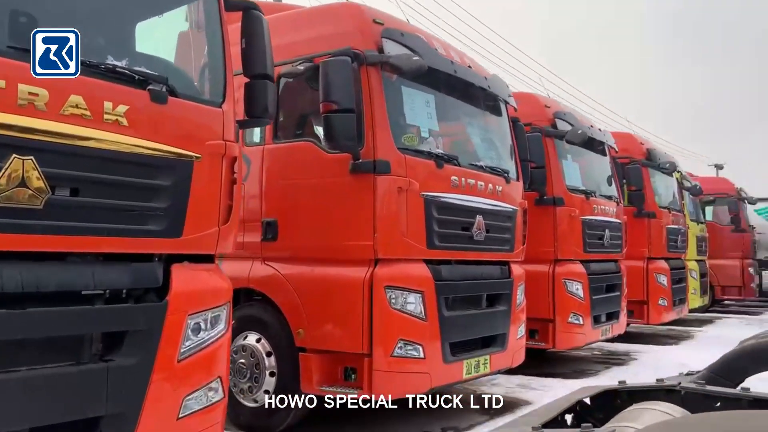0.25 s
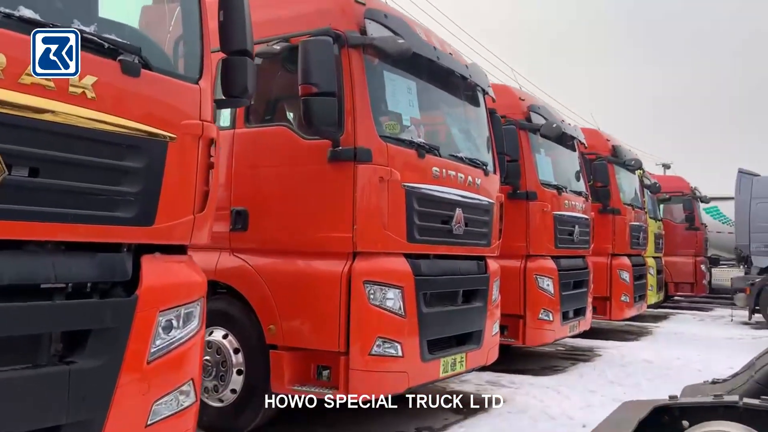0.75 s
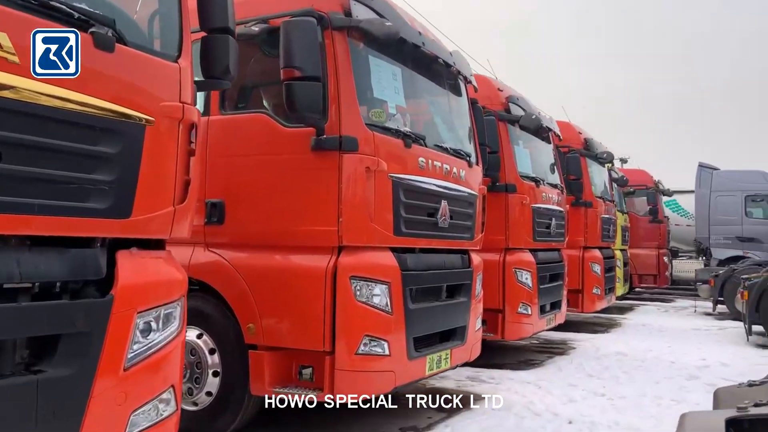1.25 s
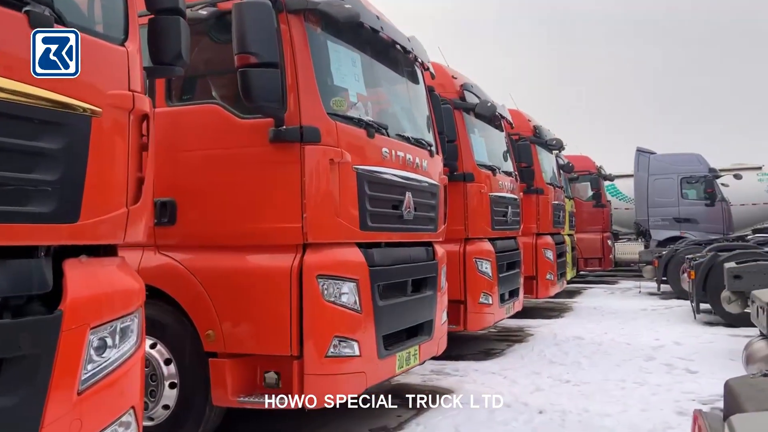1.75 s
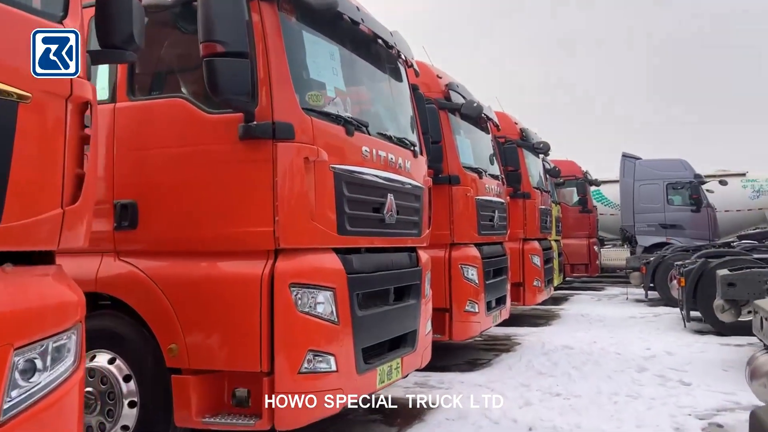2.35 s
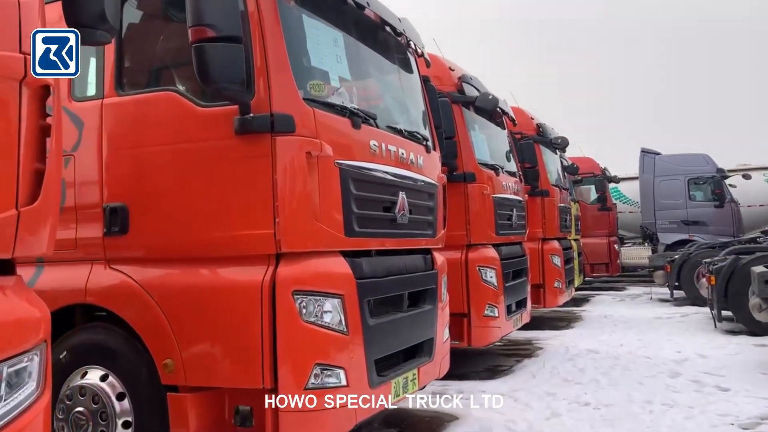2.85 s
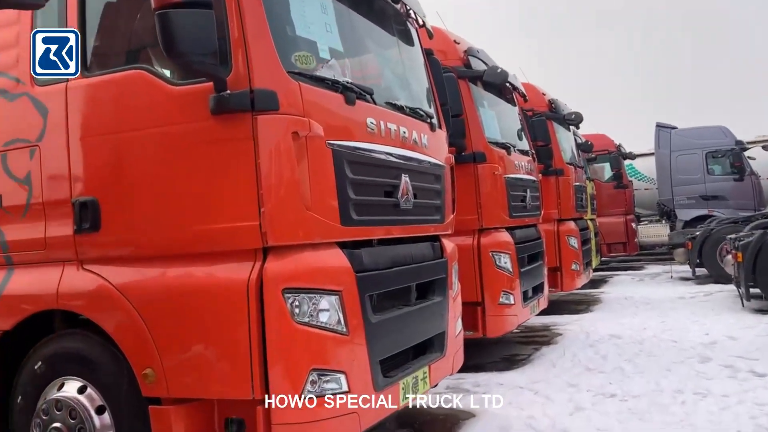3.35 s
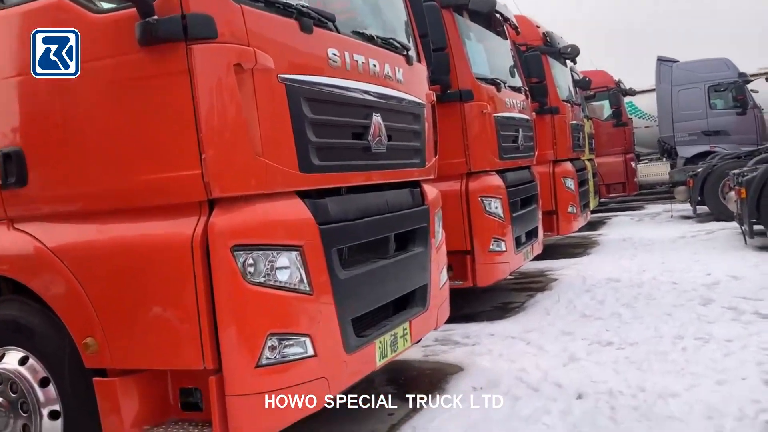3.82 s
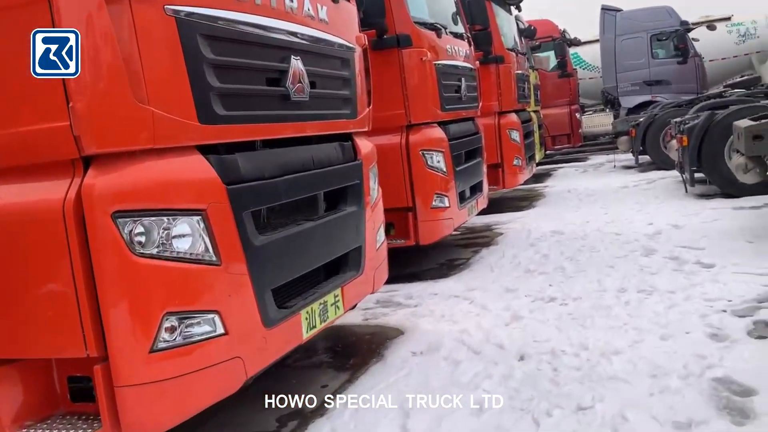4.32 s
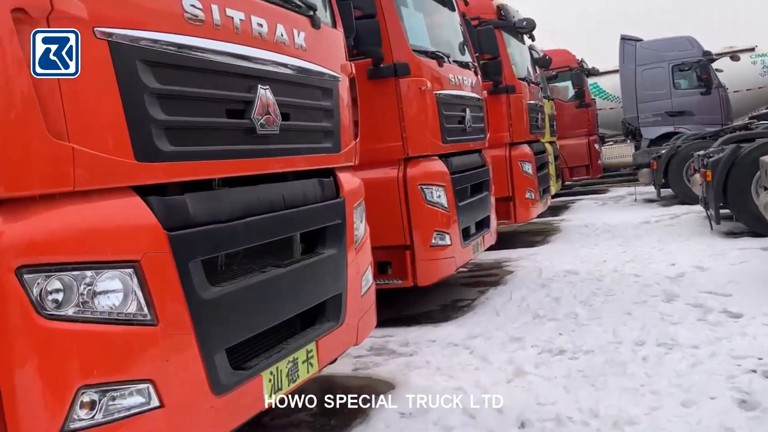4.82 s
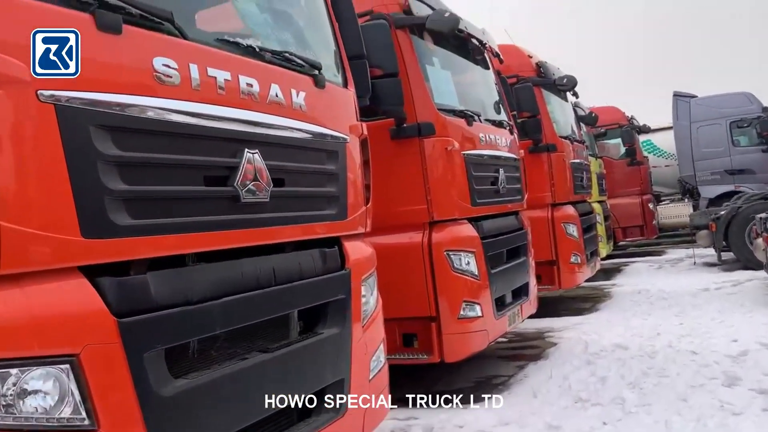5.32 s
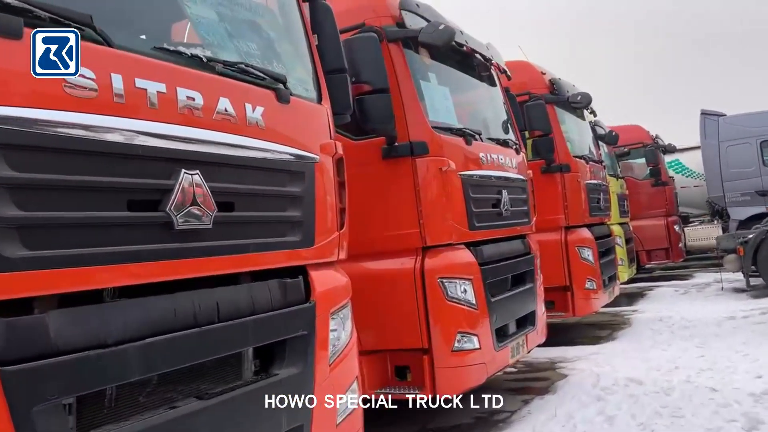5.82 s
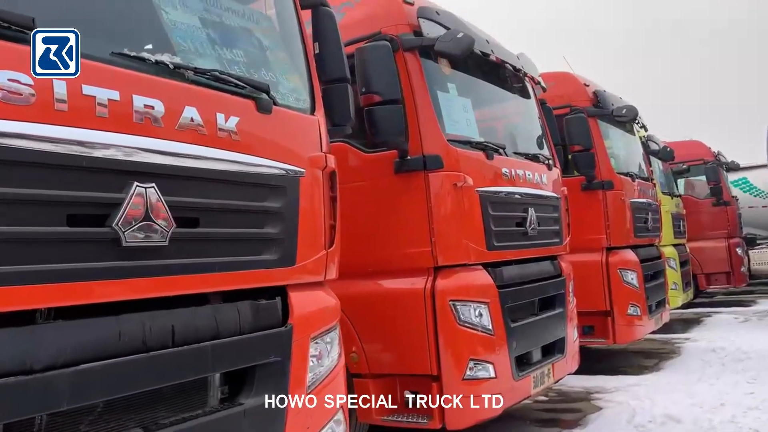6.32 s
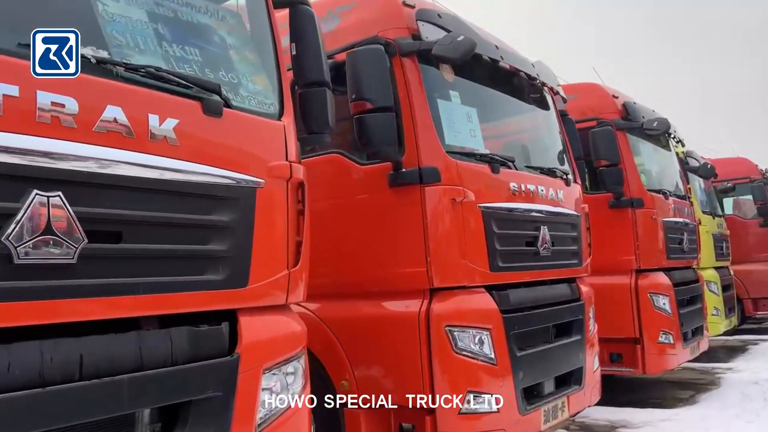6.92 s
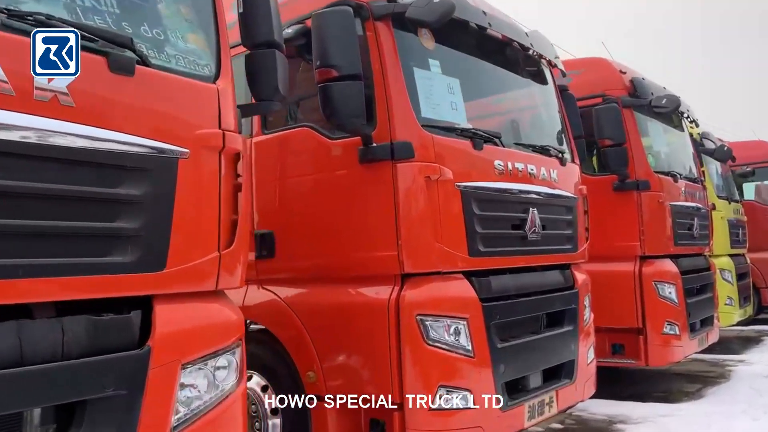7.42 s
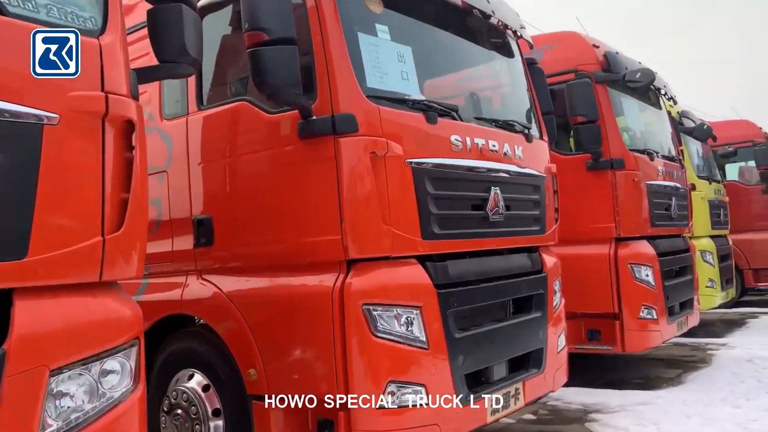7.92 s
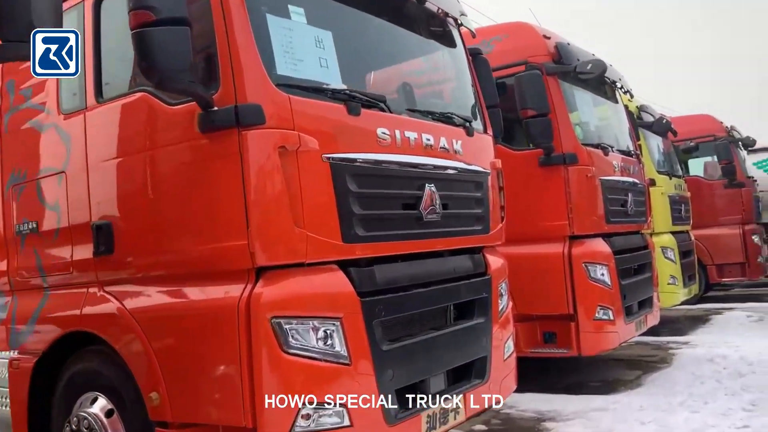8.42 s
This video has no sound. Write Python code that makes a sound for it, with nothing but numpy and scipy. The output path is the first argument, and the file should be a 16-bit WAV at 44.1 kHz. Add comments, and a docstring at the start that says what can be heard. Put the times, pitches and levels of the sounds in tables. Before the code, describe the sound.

Outdoors in a snowy truck yard, a diesel engine rumbles and clatters over distant traffic, rising in pitch for about three seconds before dropping back. A steady low drone remains while someone walks close to the microphones, each step a soft muffled thud with wet squelch, crumbling slush, gritty scuffs and tiny ice snaps. Wide stereo; the background gradually sinks.

```python
"""A diesel engine rumbles and clatters over the wash of distant traffic, speeds up and drops back.
Then it drones on while someone walks through packed snow and slush in a truck yard.
The engine is a stack of firing harmonics; rumble, traffic and hiss are coloured patchy noise.
Steps are filtered jolts with a wet squelch, ringing grit in the scuffs, snapping ice and popping air,
over the crush and fizz of snow under the sole."""
import sys
import numpy as np
from scipy import signal
from scipy.fft import rfft, irfft, next_fast_len
from scipy.io import wavfile
from scipy.ndimage import uniform_filter1d, map_coordinates

SR = 44100
rng = np.random.default_rng(int(sys.argv[2]) if len(sys.argv) > 2 else 0)


def master_out(mix):
    """Clip the mix to full scale and print it as 16-bit PCM to the path in sys.argv[1]."""
    frames = np.transpose(np.atleast_2d(mix))
    ceiling = np.clip(frames, -1, 1)
    pcm = np.round(ceiling * 32767).astype(np.int16)
    wavfile.write(sys.argv[1], SR, pcm)


N = 381906  # length in samples

# The sole slides through grit:
# centre_s, relative level_db, half_length_s, middle grain_pitch_hz, relative wet_fizz_db
SCUFFS = [(0.669, -40.5, 0.012, 2200, -53.5), (0.694, -47, 0.014, 1790, -64),
          (1.133, -39.5, 0.0064, 1480, -55), (1.368, -35.5, 0.013, 1177, -49.5),
          (1.705, -44.5, 0.017, 1220, -91), (2.022, -50, 0.011, 1900, -60), (2.18, -41.5, 0.023, 1700, -47),
          (2.842, -42.5, 0.026, 1380, -59.5), (3.255, -40.5, 0.017, 1017, -69),
          (3.921, -45.5, 0.013, 955, -74), (4, -47, 0.016, 1260, -69), (4.98, -56.5, 0.025, 2480, -54.5),
          (5.079, -50, 0.012, 3985, -62), (5.95, -52.5, 0.023, 1600, -66), (7.139, -48.5, 0.014, 1180, -56),
          (7.178, -36.5, 0.006, 1290, -49), (7.213, -34, 0.01, 1060, -49), (7.232, -42.5, 0.017, 1500, -48),
          (7.298, -47.5, 0.028, 710, -89)]
# Weight rolls over one foot and squeezes the snow:
# centre_s, half_length_s, relative hiss_db, relative wet_fizz_db
STRIDES = [(0.083, 0.24, -64, -69.5), (0.75, 0.11, -58.5, -70), (1.4, 0.13, -58.5, -62),
           (2.094, 0.35, -62.5, -67), (2.857, 0.31, -67.5, -70), (3.524, 0.17, -66, -70),
           (4.084, 0.23, -61, -66), (4.757, 0.19, -65, -70.5), (5.3, 0.078, -62.5, -70.5),
           (5.86, 0.18, -59, -68), (6.566, 0.14, -62, -65.5), (7.414, 0.27, -67.5, -79),
           (7.873, 0.14, -64, -87), (8.377, 0.17, -67, -75)]
# Colour of the hiss in the yard and under the sole: pitch_hz, relative level_db
HISS = [(1500, 7.5), (3000, 7.5), (4400, 12), (5200, 1), (7000, 3.5), (9000, -24), (16000, -36)]


def amp(db):
    """Decibels to gain."""
    return 10 ** (np.asarray(db) / 20)


def unit(x):
    """Scale to rms 1."""
    return x / np.sqrt(np.mean(x ** 2) + 1e-20)


def along(points, hz):
    """(Hz, value) points read on a log frequency axis."""
    f, v = np.transpose(points)
    return np.interp(np.log(hz + 1), np.log(f + 1), v)


def curves(rows):
    """One value per sample for each column after the time."""
    s, *cols = np.transpose(rows)
    return [np.interp(np.arange(N) / SR, s, c) for c in cols]


def wobble(rate):
    """A smooth random curve with `rate` knots a second."""
    knots = rng.standard_normal(int(N * rate / SR) + 4)
    return map_coordinates(knots, [np.arange(N) * rate / SR])


def filtered(x, response):
    """Filter x by a complex response of frequency."""
    m = next_fast_len(N + 8192)
    return irfft(rfft(x, m) * response(np.fft.rfftfreq(m, 1 / SR)), m)[..., :N]


def causal(gain_db, size=4096):
    """The shortest causal pulse with spectrum gain_db(Hz): its cepstrum is folded onto positive time."""
    cepstrum = irfft(np.log(amp(gain_db(np.fft.rfftfreq(size, 1 / SR))) + 1e-6))
    cepstrum[1:size // 2] *= 2
    cepstrum[size // 2 + 1:] = 0
    return irfft(np.exp(rfft(cepstrum)))


def add(track, s, sound):
    """Mix a sound into the track at time s."""
    start = max(round(s * SR), 0)
    part = track[..., start:start + sound.shape[-1]]
    part += sound[..., :part.shape[-1]]


def swell(s, half, shape):
    """A rise and fall around time s; shape 1 is pointed, 2 is round."""
    return np.exp(-np.abs((np.arange(N) / SR - s) / half) ** shape)


def running(rows, fade=0.52):
    """1 while a table lasts, fading out over `fade` seconds beyond its ends."""
    first, last = rows[0][0], rows[-1][0]
    return np.interp(np.arange(N) / SR, [first - fade, first, last, last + fade], [0, 1, 1, 0])


def spread(pair, spectrum):
    """Two unrelated signals become mid and side of one coloured stereo sound of rms 1."""
    # How alike left and right are: pitch_hz, correlation
    alike = [(60, 1), (170, 0.81), (350, 0.62), (650, 0.0075), (1100, 0.13), (3000, 0.078), (6000, 0.33),
             (9000, 1), (13000, 0.47)]
    turn = lambda hz: np.arccos(np.clip(along(alike, hz), -1, 1)) / 2
    mid_side = lambda hz: np.array([np.cos(turn(hz)), np.sin(turn(hz))])
    mid, side = filtered(pair, lambda hz: amp(along(spectrum, hz)) * mid_side(hz))
    return unit(np.array([mid + side, mid - side]))


def rush(spectrum, patchy_db):
    """Coloured stereo noise with smooth time-frequency patches of random gain."""
    z = signal.stft(rng.standard_normal((2, N)), nperseg=512)[2]
    field = uniform_filter1d(rng.standard_normal(z.shape[1:]), size=5, axis=0)
    field = uniform_filter1d(field, size=12, axis=1)
    noise = signal.istft(z * amp(patchy_db * unit(field)), nperseg=512)[1]
    return spread(noise[:, :N], spectrum)


def grains(spectrum, per_second, scatter_db):
    """Tiny fractures: impulses of uneven size at random moments."""
    sizes = rng.standard_normal((2, N)) * amp(scatter_db * np.clip(rng.standard_normal(N), -2, 2))
    return spread(sizes * (rng.random(N) < per_second / SR), spectrum)


def yard():
    """Exhaust rumble, distant traffic and a faint hiss that drifts in level."""
    # The background sinks as the walker moves on; relative levels:
    # time_s, rumble_db, traffic_db, hiss_db
    levels = [(0.0, -41, -43, -61.5), (1.6, -40.5, -42.5, -63.5), (2.45, -39.5, -48, -67),
              (3.1, -38, -43.5, -68.5), (3.72, -48.5, -49.5, -65), (4.15, -40.5, -47.5, -69),
              (5.9, -42.5, -48.5, -68.5), (6.95, -45, -54.5, -71.5), (8.66, -45.5, -59.5, -73)]
    # Colours: pitch_hz, relative level_db
    rumble_colour = [(18, -27), (30, -9.5), (45, -4), (88, 1), (135, -5.5), (200, -11), (300, -27),
                     (600, -78)]
    traffic_colour = [(120, 4), (220, 5.5), (400, 4.5), (700, -3.5), (1100, -7), (1600, -8.5), (2300, -13),
                      (3200, -28), (6000, -79)]
    rumble_db, traffic_db, hiss_db = curves(levels)
    rumble = amp(rumble_db + 2.0) * rush(rumble_colour, patchy_db=2.0)
    traffic = amp(traffic_db) * rush(traffic_colour, patchy_db=2.0)
    drift = amp(1.2 * wobble(7))
    hiss = amp(hiss_db + 1.5) * drift * rush(HISS, patchy_db=2.0)
    return rumble + traffic + hiss


def engine_droning():
    """A firing tone; uneven cylinders add a weak line at half the firing rate."""
    # The drone: time_s, firing_hz, relative level_db
    drone = [(3.7, 66.8, -47), (3.91, 65.9, -39.5), (4.4, 63.4, -41), (5.15, 62.5, -41),
             (6.6, 62.94, -39.5), (6.8, 61.9, -38), (6.92, 61.9, -50), (7.08, 61.9, -45.5),
             (7.33, 64.14, -38), (7.94, 65.9, -42), (8.66, 68.76, -44)]
    hz, db = curves(drone)
    phase = 2 * np.pi * np.cumsum(hz) / SR
    half_rate = amp(-8 + 1.5 * wobble(3)) * np.sin(phase / 2)
    tone = np.sin(phase) + half_rate
    return amp(db + 5.0 + 0.21 * wobble(8.6)) * tone * running(drone)


def engine_pulling():
    """Firing harmonics through the muffler, with mechanical clatter that pulses at the firing rate."""
    # The engine speeds up and drops back: time_s, firing_hz, relative fundamental_db
    pull = [(0.0, 39.9, -35.5), (0.8, 45.55, -30.5), (1.1, 47.25, -36.5), (1.81, 51.93, -27.5),
            (1.98, 54.53, -32.5), (2.16, 54.93, -30), (2.91, 58.27, -25), (3.1, 58.1, -24),
            (3.2, 55.6, -39), (3.3, 52, -33), (3.48, 42.7, -47), (3.7, 39.7, -52)]
    # Second harmonic: time_s, relative level_db
    octave = [(0, -36), (1.35, -38), (1.8, -45.5), (2.05, -47), (2.4, -44.5), (3.1, -46.5), (3.7, -53)]
    # Upper harmonics and clatter fade with distance: time_s, relative level_db
    near = [(0, -50.5), (1.1, -50), (1.9, -53), (2.7, -62), (3.7, -68)]
    # Muffler gain of the upper harmonics: pitch_hz, gain_db
    muffler = [(120, -7.5), (185, -9), (205, 3.5), (223, 6.5), (240, -5), (300, -11), (370, -7), (480, -60)]
    # Colour of the clatter: pitch_hz, relative level_db
    clatter_colour = [(180, -17), (350, -7), (480, 13.5), (700, -3), (1100, 8), (1500, -22), (2300, -31),
                      (3500, -53), (7000, -49.5)]
    hz, db = curves(pull)
    octave_db, = curves(octave)
    near_db, = curves(near)
    phase = 2 * np.pi * np.cumsum(hz) / SR
    tone = amp(db + 4.0 + 0.13 * wobble(8.8)) * np.sin(phase)
    tone += amp(octave_db + 4.5 + 0.34 * wobble(6.5)) * np.sin(2 * phase)
    for k in np.arange(3, 10):
        level = amp(near_db + 6.0 + along(muffler, k * hz) + 1.8 * wobble(6.6))
        tone += level * np.sin(k * phase + 0.08 * wobble(4.8))
    throb = 1 + .7 * np.sin(phase)
    clatter = amp(near_db) * throb * grains(clatter_colour, per_second=3500, scatter_db=3)
    return (tone + clatter) * running(pull)


def fizz(stride_shape=1.75, scuff_shape=1.3, rest_db=-78, clump_db=3):
    """Water and air squeeze out of the snow in fine clumps with every stride and scuff."""
    # Colour of the fizz: pitch_hz, relative level_db
    wet_colour = [(3000, -25), (6000, -9), (7700, -4), (8300, 1), (9000, -2), (10800, -5), (12400, -3),
                  (14400, -2), (16000, -7)]
    wet = sum(amp(db) * swell(s, half, stride_shape) for s, half, _, db in STRIDES)
    wet += sum(amp(db) * swell(s, half, scuff_shape) for s, _, half, _, db in SCUFFS)
    level = np.hypot(wet * amp(clump_db * wobble(35)), amp(rest_db))  # never below rest_db
    return level * grains(wet_colour, per_second=6500, scatter_db=0.0)


def strides(shape=4.0):
    """Snow compacts with a low crush and gritty hiss; small lumps give way and stray crumbs crackle."""
    # Colour of snow compacting under the sole: pitch_hz, relative level_db
    crush_colour = [(120, -3), (250, 0.5), (430, 12), (700, 5), (1100, -2), (1900, -8), (3200, -13.5),
                    (6000, -70)]
    # Colour of lumps and crumbs: pitch_hz, relative level_db
    crumb_colour = [(250, -25), (700, -2), (1500, 0), (2500, -8), (5000, -24), (12000, -40)]
    weight = sum(amp(db) * swell(s, half, shape) for s, half, db, _ in STRIDES)
    crush = amp(10 + 2.1 * wobble(30)) * grains(crush_colour, per_second=900, scatter_db=3.0)
    hiss = amp(2.3 * wobble(25)) * grains(HISS, per_second=3400, scatter_db=1)
    lumps = amp(-3) * grains(crumb_colour, per_second=240, scatter_db=1.5)
    stray = amp(-69) * grains(crumb_colour, per_second=50, scatter_db=3)  # also between strides
    return weight * (crush + hiss + lumps) + stray


def pops(pocket_t60=.028, crack_hz=1000, crack_t60=.0035):
    """Pockets of air ring in the wet slush; bits of crust crack in about a single dry cycle."""
    # Air pockets pop under the sole: start_s, relative level_db, pitch_hz
    pockets = [(1.365, -29, 1220), (7.1745, -21, 700), (7.211, -31, 680)]
    # Bits of frozen crust crack: start_s, relative level_db
    cracks = [(0.066, -29), (0.2, -27), (0.304, -28), (1.619, -25), (2.069, -26), (2.286, -25)]
    out, t = np.zeros(N), np.arange(SR // 10) / SR
    ring = lambda hz, t60: np.sin(2 * np.pi * hz * t) * amp(-60 * t / t60)
    for s, db, hz in pockets:
        onset = 1 - np.exp(-hz * t)
        add(out, s, amp(db) * ring(hz, pocket_t60) * onset)
    for s, db in cracks:
        add(out, s, amp(db) * ring(crack_hz, crack_t60))
    return out


def ticks(snap_t60=.03, tail_t60=0.3, tail_db=-13, side_share=0.44):
    """Ice crystals snap, then spray fragments: decaying noise; smaller crystals sound higher."""
    # Crystals: start_s, relative level_db, lowest_pitch_hz (softer below it)
    crystals = [(0.087, -40.5, 5100), (0.32, -39, 7500), (1.1323, -34, 6700), (2.5714, -33.5, 3830),
                (2.639, -43.5, 3950), (2.697, -41.5, 4040), (2.926, -43.5, 4000), (3.811, -39.5, 4750),
                (3.91, -31, 1400), (5.079, -34.5, 3940), (5.233, -41.5, 1600), (6.436, -43.5, 3200),
                (6.706, -42.5, 4000), (7.1745, -37, 2973), (7.211, -38, 3000)]
    # Colour of breaking ice: pitch_hz, relative level_db
    ice = [(600, -21), (2000, 9), (5000, -2), (8300, -1.5), (11000, -3.5), (14500, -5), (16000, -9)]
    out, t = np.zeros((2, N)), np.arange(SR // 5) / SR
    decay = amp(-60 * t / snap_t60) + amp(tail_db - 60 * t / tail_t60)
    for s, db, low_hz in crystals:
        bits = rng.standard_normal((2, len(t))) * amp(0.77 * rng.standard_normal(len(t)))
        mid, side = bits * decay
        low_cut = [(low_hz / 2, -12), (low_hz, 0)]
        pulse = causal(lambda hz: along(ice, hz) + along(low_cut, hz), size=512)
        pulse /= np.linalg.norm(pulse)
        pair = np.array([mid + side_share * side, mid - side_share * side])
        add(out, s, amp(db - 11.5) * signal.fftconvolve(pair, pulse[None], axes=1))
    return out


def scuffs(count=64, pitch_spread=0.42, life_cycles=1.6, size_db=4, dust_db=-14, side_share=0.8):
    """Each slide breaks a dense cluster of icy grains that ring briefly, over a swell of finer dust."""
    # Colour of the dust: pitch_hz, relative level_db
    grit = [(150, -15), (400, -20), (900, 2), (2000, 20), (3200, 10), (5500, 14), (9000, -1), (16000, -45)]
    out, dust, t = np.zeros((2, N)), np.zeros(N), np.arange(400)
    for s, db, half, grain_hz, _ in SCUFFS:
        when, pitch, size, side = rng.standard_normal((count, 4)).T
        grain_pitches = grain_hz * np.exp(pitch_spread * np.clip(pitch, -2, 2))
        cycles = np.outer(grain_pitches, t) / SR
        # grains are largest in the middle of the slide, where the pressure peaks
        strength = amp(size_db * np.clip(size, -2, 2)) / np.hypot(1, when)
        rings = strength[:, None] * np.sin(2 * np.pi * cycles) * np.exp(-cycles / life_cycles)
        at = np.round((s + half * when) * SR).astype(int)[:, None] + t
        # every grain reaches the two microphones at its own strengths
        burst = []
        for sign in (1, -1):
            heard = rings * (1 + sign * side_share * side)[:, None]
            burst.append(np.bincount(at.ravel(), heard.ravel(), N)[:N])
        burst = np.array(burst)
        out += amp(db) * burst * 2 * np.sqrt(half * SR) / np.linalg.norm(burst)
        dust += amp(db + dust_db) * swell(s, half, shape=0.76)
    return out + dust * grains(grit, per_second=5000, scatter_db=4)


def thuds(lead=.008, settle_t60=0.13, creep_db=-19, usual_db=-14, tilt_share=0.76, uneven_db=2):
    """Slush creeps, yields in a soft jolt that falls in pitch, topped by a squelch, then crumbles."""
    # Heel and sole press the slush flat: jolt_s, relative level_db, upper_band_vs_lower_db,
    # body_pitch_hz, crumbling_vs_jolt_db
    presses = [(2.5703, -30.5, 2, 405, -8.5), (2.8629, -29, -28, 380, -6), (2.877, -31.5, -32, 420, -4),
               (2.9226, -20.5, -19, 370, -10), (3.073, -23, -29, 430, -8), (3.2754, -29, -17, 345.5, -1.5),
               (3.394, -30.5, -24, 353, -9.5), (3.4765, -35, -42, 368, -1.5), (3.5219, -34, -10, 380, -12),
               (3.541, -28, -16, 344, -2.5), (3.5915, -24.5, -3.5, 416, -8), (3.808, -27, -15.5, 624, -20),
               (3.8138, -20.5, -12, 324, -7.5), (3.988, -23.5, -7.5, 312, -3.5),
               (4.1288, -36, -1, 460, 1.5), (4.1367, -30, -18, 380, -3.5), (4.2161, -38, 11.5, 410, -2.5),
               (4.415, -37, -1.5, 367.3, -13), (4.5974, -34.5, -1, 422, -6), (4.791, -32, -13, 420, -2),
               (4.805, -22.5, -17, 473, -11.5), (4.8646, -27, -22.5, 527, -15),
               (5.001, -34.5, -11, 370, -3), (5.0365, -34.5, -6, 427, -0.5),
               (5.0748, -19, -10.5, 360, -7.5), (5.3904, -30.5, -15, 466, -10),
               (5.419, -17, -14, 405, -14.5), (5.4537, -23, -23, 380, -10.5),
               (5.5646, -21, -11.5, 426.4, -13), (5.7124, -33, -16, 419, 1.5),
               (5.744, -29.5, -18, 420, -4.5), (5.8388, -21, -14.5, 426, -10.5),
               (5.977, -33, -8.5, 316, 0.5), (6.1024, -41.5, 4, 450, -12), (6.1255, -19, -12.5, 416, -8),
               (6.4349, -19, -26, 494, -13.5), (6.443, -27.5, -35, 485.6, -7.5),
               (6.6062, -23, -18, 455, -5), (6.704, -29.5, -11, 400, -5.5), (7.147, -33, -21, 322, 6.5),
               (7.1753, -33, -27, 725, -10), (7.6407, -39, 5, 440, -8), (7.868, -27, -17.5, 465.5, -9),
               (7.978, -39, -6.5, 415, -1.5), (8.252, -29, -10, 457, -5.5), (8.359, -41.5, -15, 520, -1),
               (8.4154, -37.5, -7.5, 428, 5.5)]
    # Colour of a thud whose body pitch is body_ref_hz: pitch_hz, relative level_db
    body_colour = [(60, -55), (150, -5), (270, 4), (420, 2.5), (540, -1), (780, -11), (1050, -17),
                   (1600, -27.5), (2200, -32), (3500, -39), (16000, -69)]
    # Stereo balance: pitch_hz, left_minus_right_db
    pan = [(150, -3), (300, -2.5), (550, -11.5), (900, -2), (1300, 0), (2500, -1)]
    # Slush swallows the treble of a footfall: pitch_hz, gain_db
    soft = [(2100, 0), (2700, -8), (4000, -13), (8000, -26), (16000, -36)]
    body_ref_hz = 424
    # above this pitch a footfall is mostly wet spray; the rest is the clean edge of the jolt
    squelch_hz, squelch_t60, spray_share = 1150, .026, .6
    rebound_s, rebound_db = 0.00602, -11  # the sole settles a second time, after this long on average
    # the foot sinks in: lag of the lowest tones behind the highest, where the lag halves,
    # and the share of it by which the whole sound is moved early
    sink_s, sink_hz, sink_before = 0.0037, 340, 0.14

    out, t = np.zeros((2, 2, N)), np.arange(SR // 6) / SR - lead  # (below or above squelch_hz, left/right)
    spray = np.arcsin(np.sqrt(spray_share))
    for s, db, upper_db, body_hz, crumble_db in presses:
        # a harder contact is brighter, and no two patches of snow sound alike
        bright = tilt_share * (upper_db - usual_db)
        tilt = [(500, -0.074), (1000, bright), (1800, bright), (3500, -0.9)]
        patch = np.column_stack([np.geomspace(200, 3000, num=16), uneven_db * rng.standard_normal(16)])
        body = lambda hz: along(body_colour, hz * body_ref_hz / body_hz)
        pulse = causal(lambda hz: body(hz) + along(tilt, hz) + along(patch, hz))
        pulse /= np.linalg.norm(pulse)

        bits = rng.standard_normal((3, len(t))) * amp(7.3 * rng.standard_normal(len(t)))
        bits = bits[0] + 0.5 * bits[1:]  # left and right share a part
        crumble = bits * amp(-60 * np.abs(t) / settle_t60) * (t > .005)
        crumble /= np.linalg.norm(crumble[0])
        squelch = bits * amp(-60 * np.abs(t) / squelch_t60) * (t > 0)
        squelch /= np.linalg.norm(squelch[0])
        creep = rng.standard_normal(len(t)) * np.clip(1 + t / lead, 0, 1) * (t < 0)
        creep /= np.linalg.norm(creep)
        loose = amp(crumble_db) * crumble + amp(creep_db) * creep

        jolt = np.zeros(len(t))
        jolt[round(lead * SR)] = -1
        jolt[round((lead + rebound_s * (.5 + rng.random())) * SR)] -= amp(rebound_db)
        upper = np.cos(spray) * jolt + np.sin(spray) * squelch
        force = loose + np.array([[jolt, jolt], upper])
        add(out, s - lead, amp(db + 25.5) * signal.fftconvolve(force, pulse[None, None], axes=2))

    low_share = lambda hz: 1 / (1 + (hz / squelch_hz) ** 8)
    steps = filtered(out[0], lambda hz: np.sqrt(low_share(hz)))
    steps += filtered(out[1], lambda hz: np.sqrt(1 - low_share(hz)))
    lag = lambda hz: sink_s * (sink_hz * np.arctan(hz / sink_hz) - hz * sink_before)  # in cycles
    sink = lambda hz: np.exp(-2j * np.pi * lag(hz))
    balance = lambda hz: np.outer([.5, -.5], along(pan, hz))
    return filtered(steps, lambda hz: sink(hz) * amp(along(soft, hz) + balance(hz)))


def scene():
    """Engine and traffic beyond, steps close by."""
    background = yard() + engine_droning() + engine_pulling()
    return background + fizz() + strides() + pops() + ticks() + scuffs() + thuds()


def record(dry, low_hz=29.4, top_hz=15800):
    """The wide stereo microphones delay the low mids on the right and keep only their own band."""
    # The right channel trails: pitch_hz, phase_lag_radians
    lag = [(30, 0), (62, .17), (150, 1.2), (260, 3), (430, 5.8), (650, 9.4), (800, 12.9), (1100, 13.8),
           (1700, 12.2), (3000, 4 * np.pi)]
    band = lambda hz: (hz < top_hz) * (1 - 1 / (1 + (hz / low_hz) ** 8))
    left_right = lambda hz: np.array([np.ones_like(hz), np.exp(-1j * along(lag, hz))])
    return filtered(dry, lambda hz: band(hz) * left_right(hz))


dry = scene()
out = record(dry)
master_out(out)
```